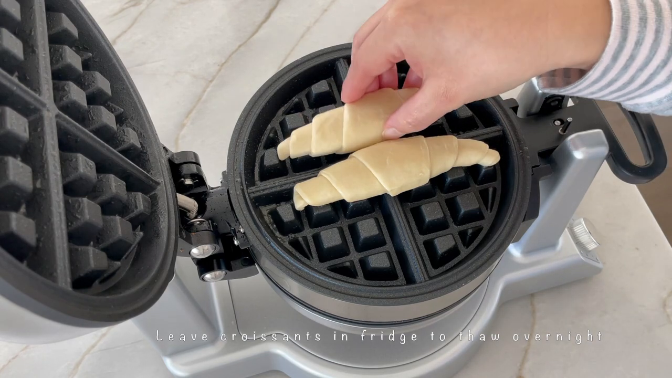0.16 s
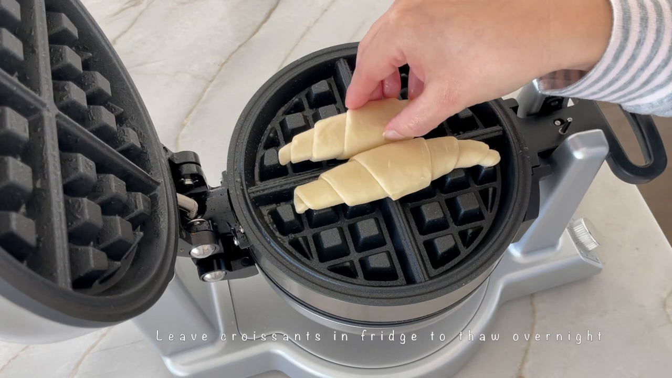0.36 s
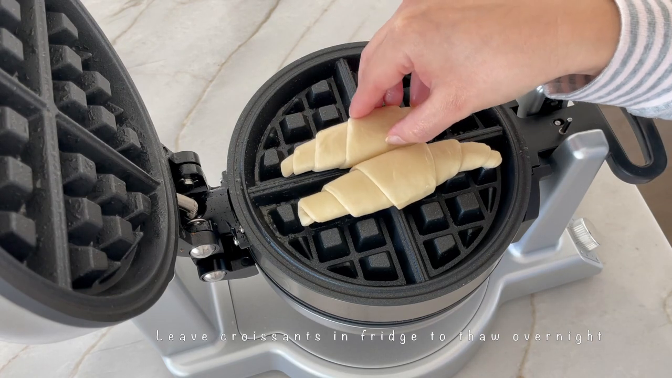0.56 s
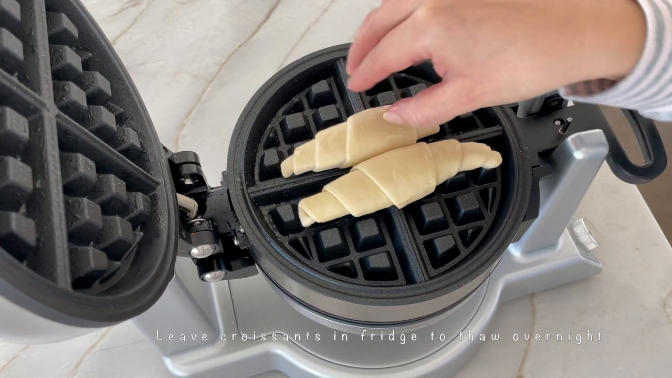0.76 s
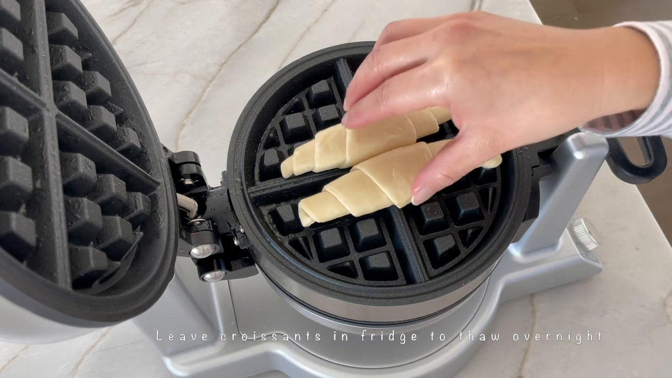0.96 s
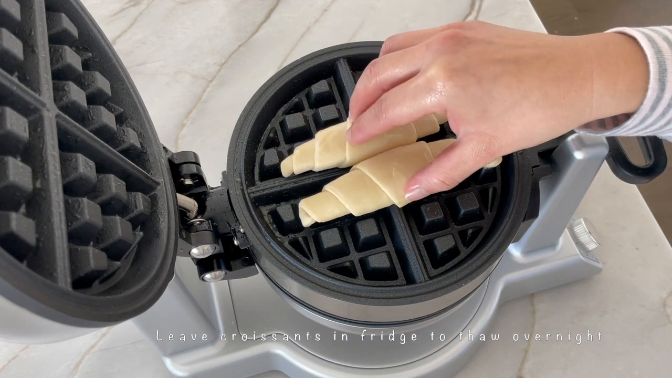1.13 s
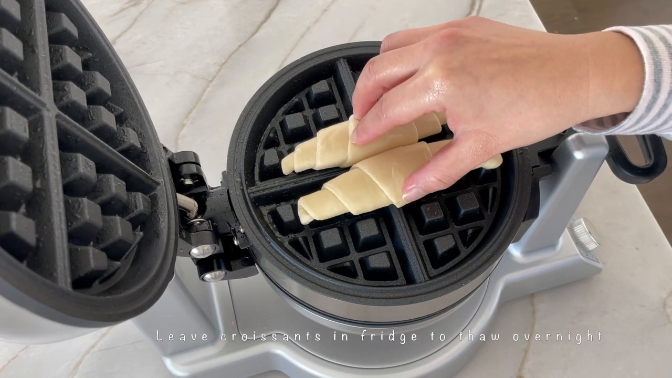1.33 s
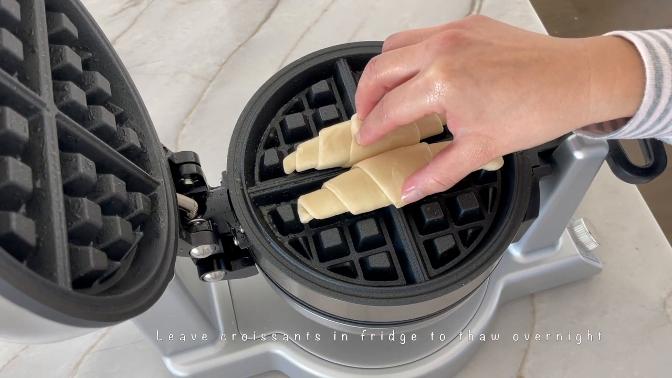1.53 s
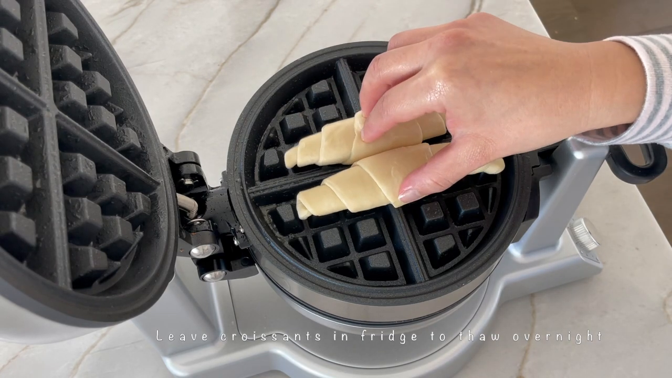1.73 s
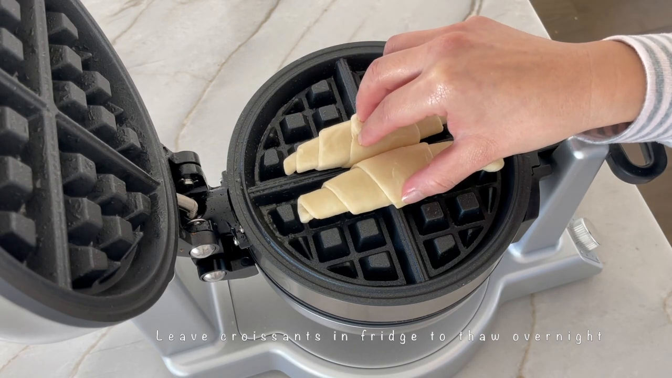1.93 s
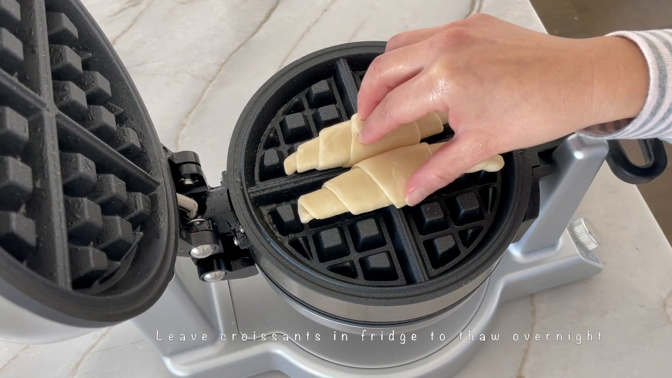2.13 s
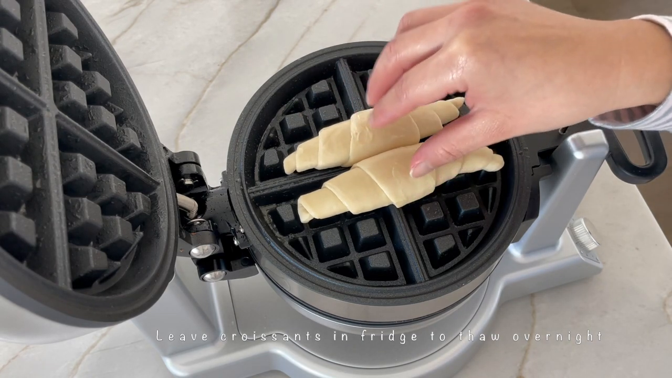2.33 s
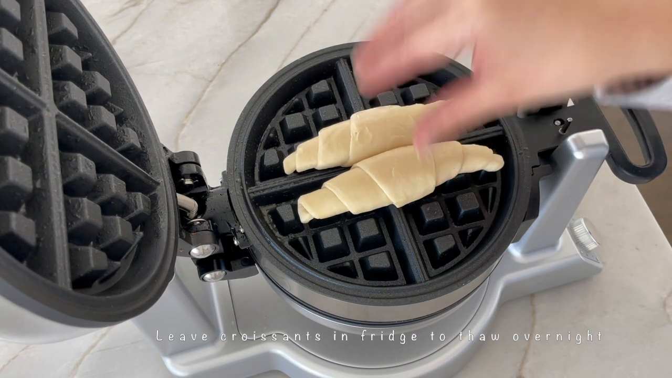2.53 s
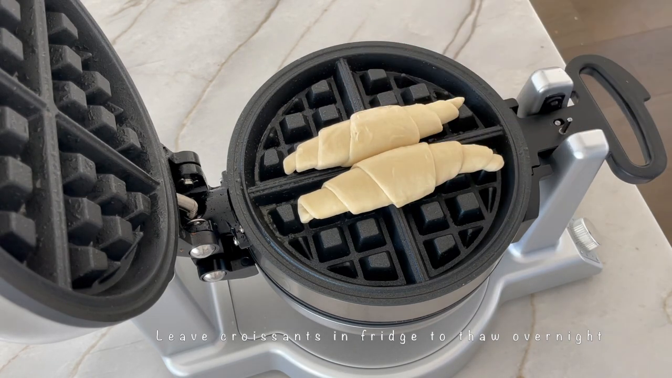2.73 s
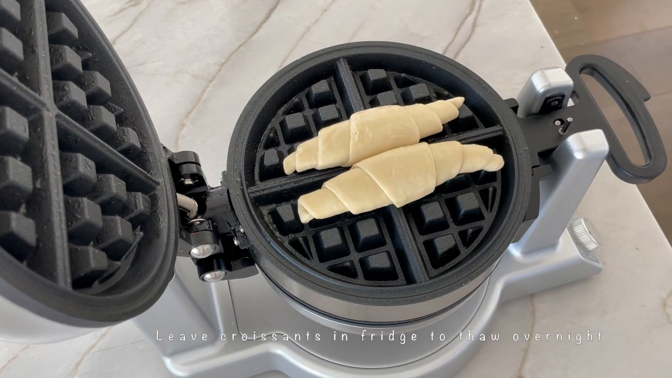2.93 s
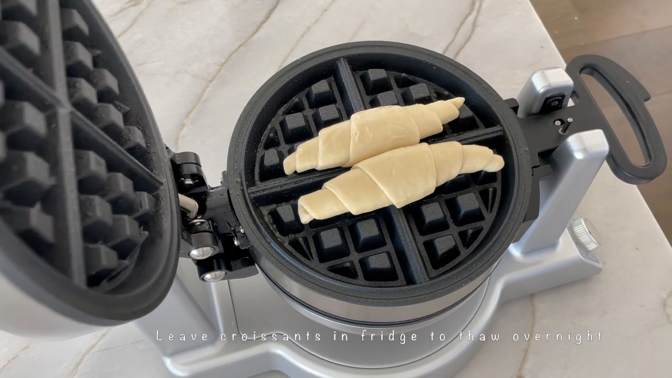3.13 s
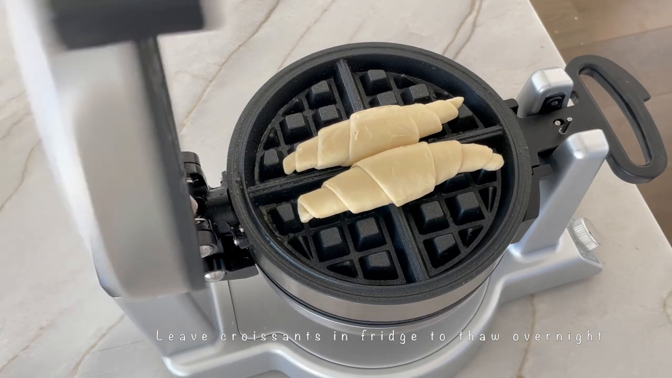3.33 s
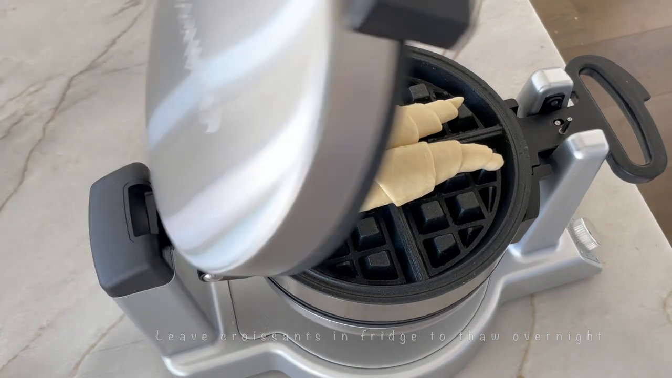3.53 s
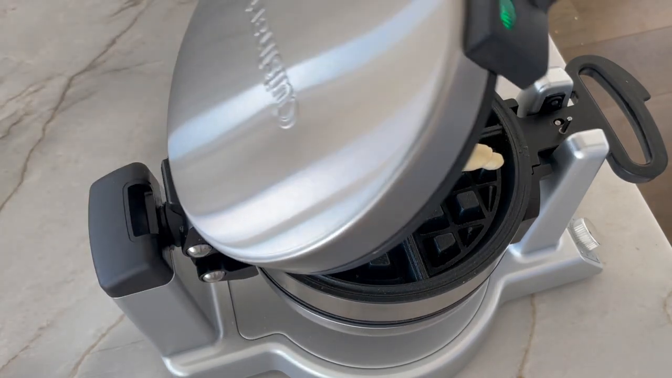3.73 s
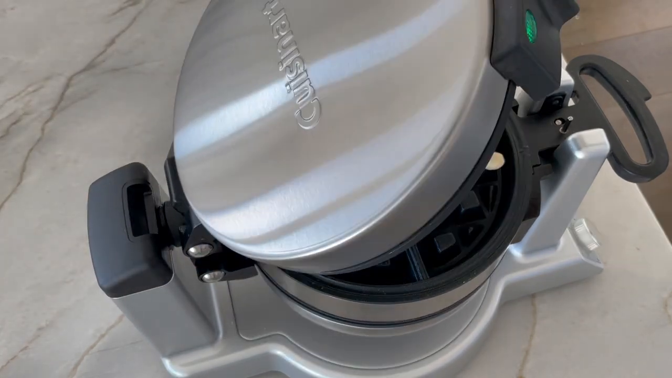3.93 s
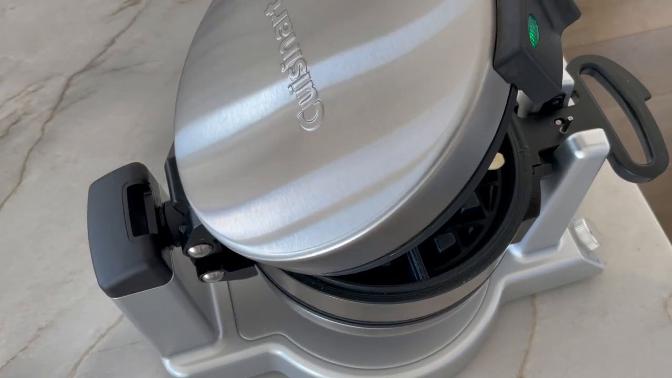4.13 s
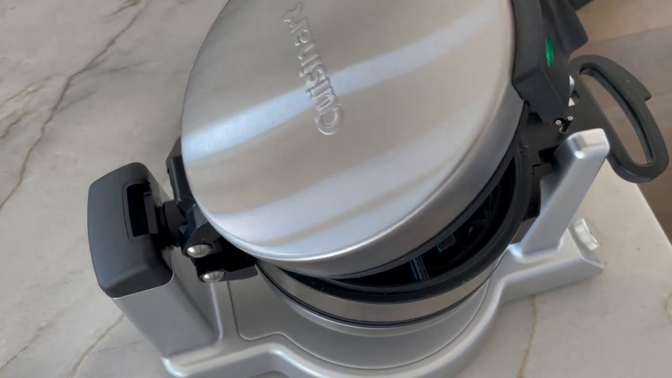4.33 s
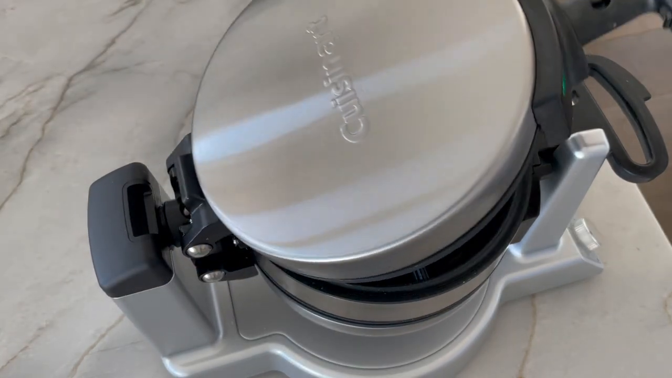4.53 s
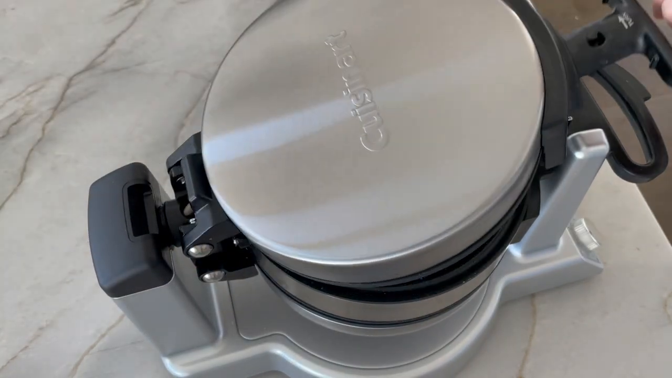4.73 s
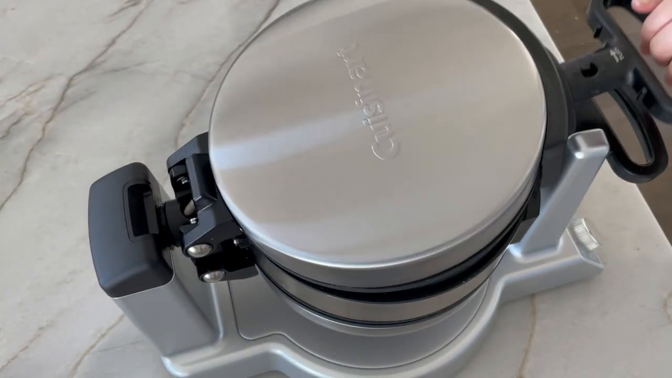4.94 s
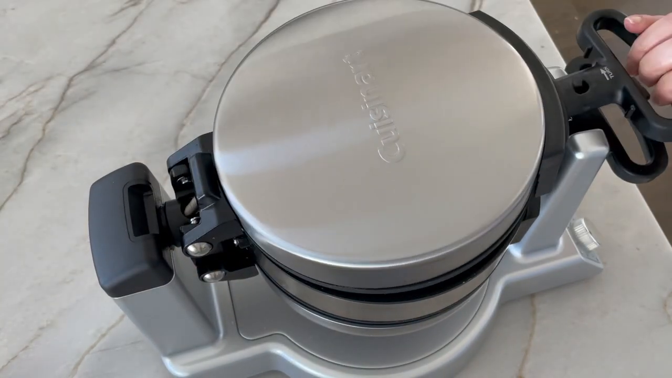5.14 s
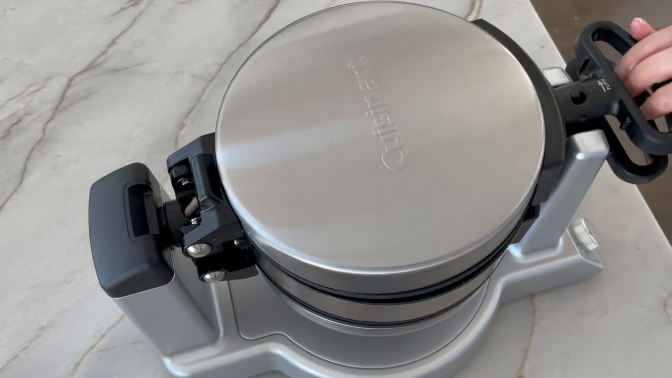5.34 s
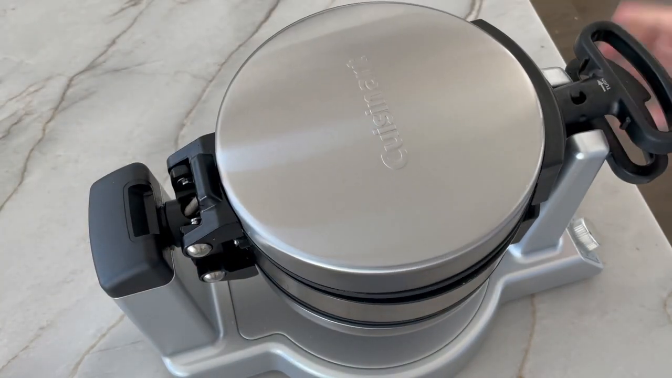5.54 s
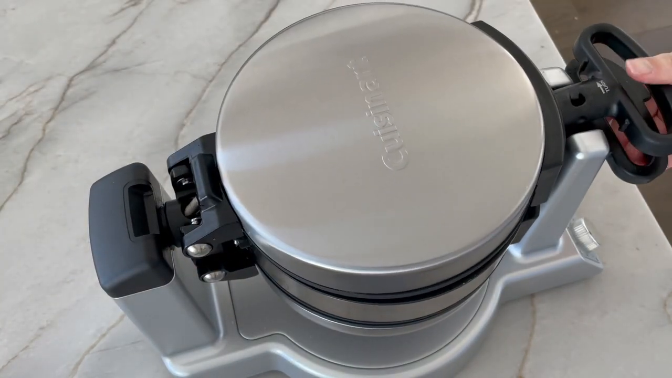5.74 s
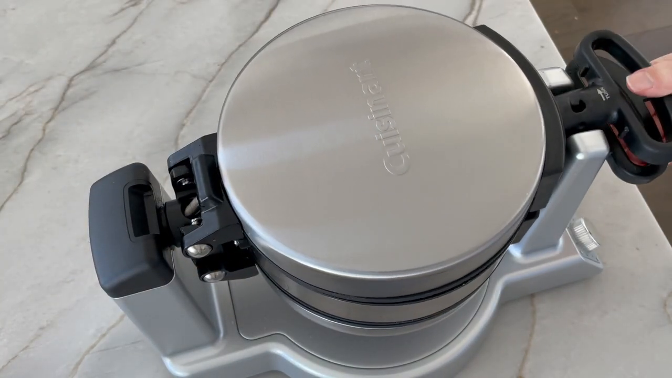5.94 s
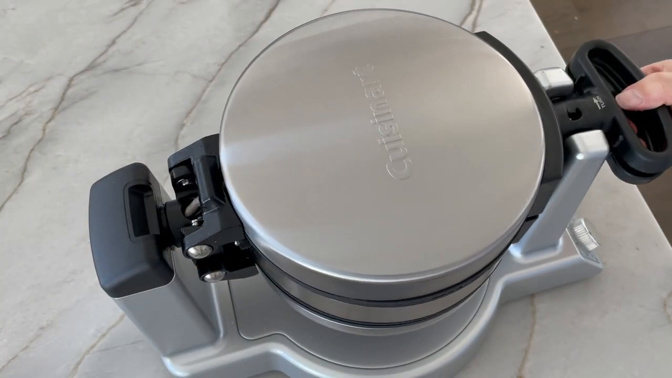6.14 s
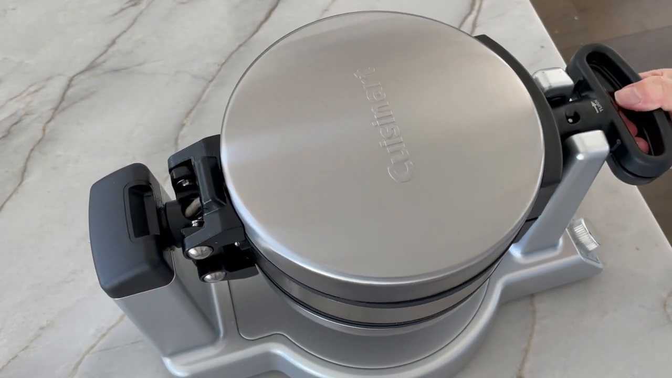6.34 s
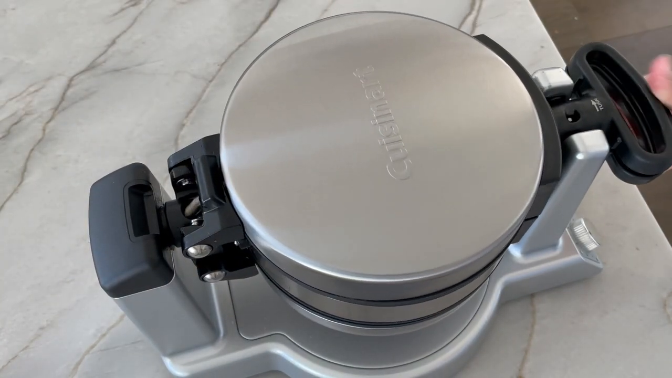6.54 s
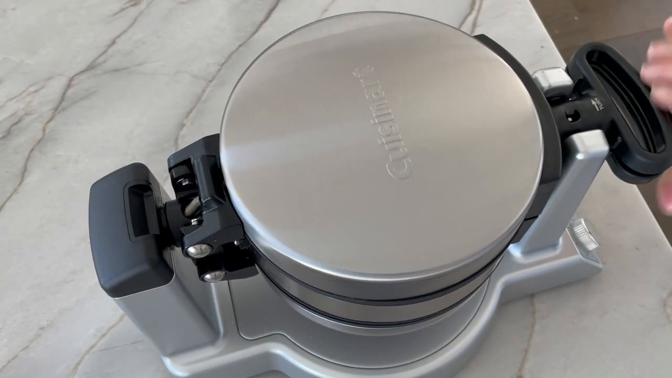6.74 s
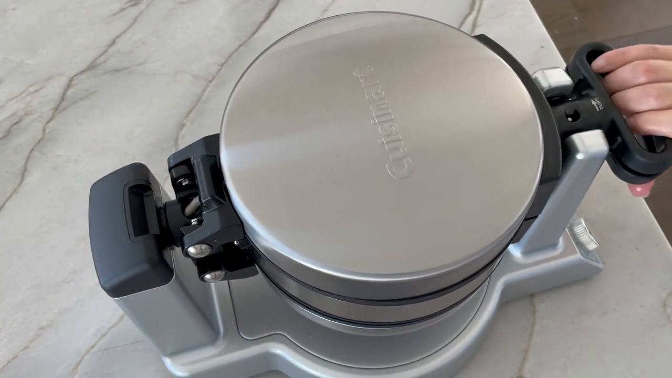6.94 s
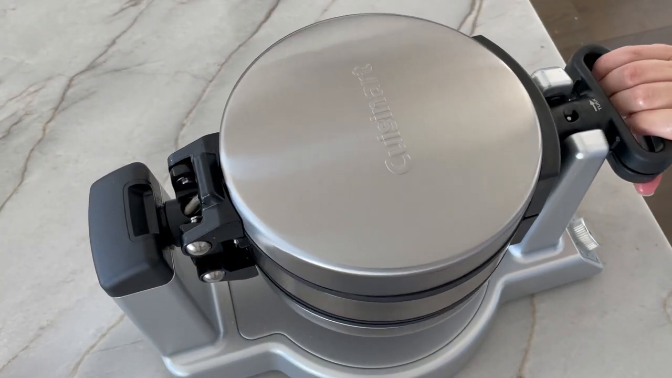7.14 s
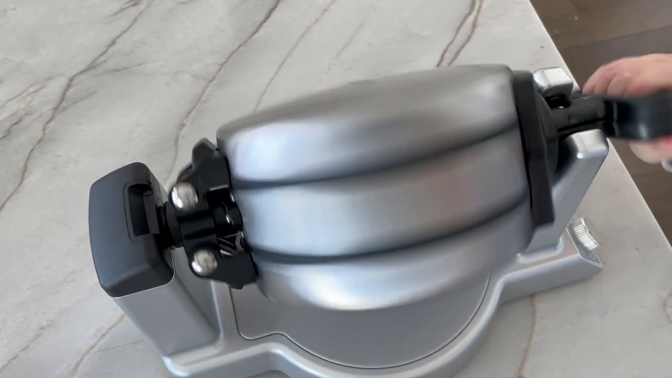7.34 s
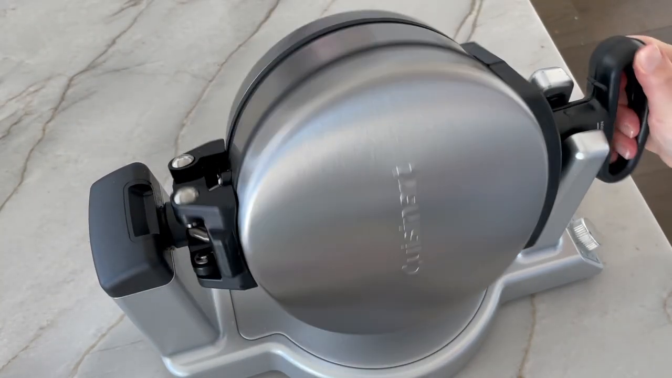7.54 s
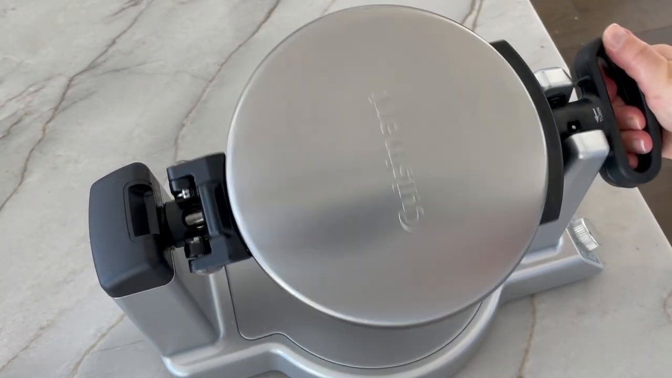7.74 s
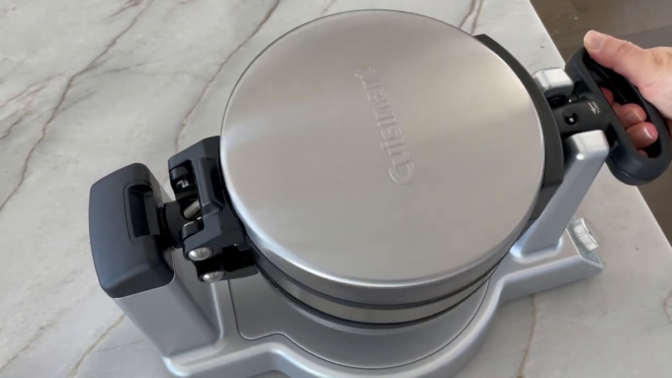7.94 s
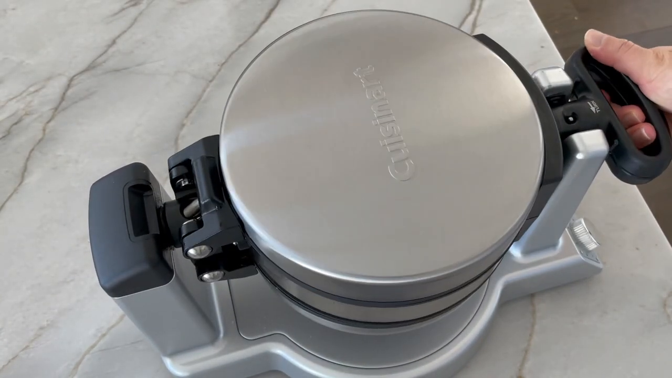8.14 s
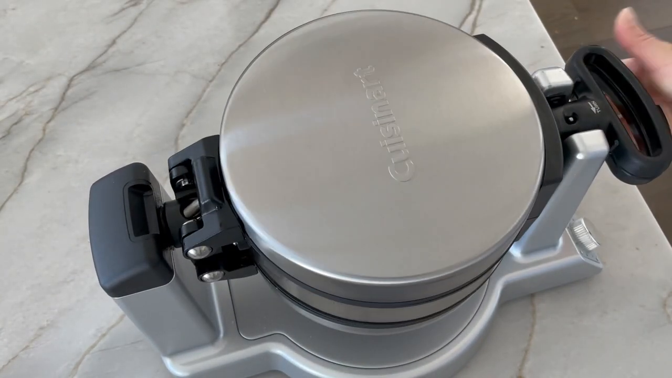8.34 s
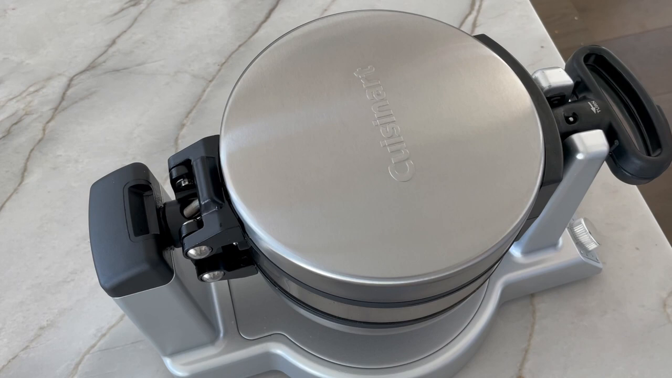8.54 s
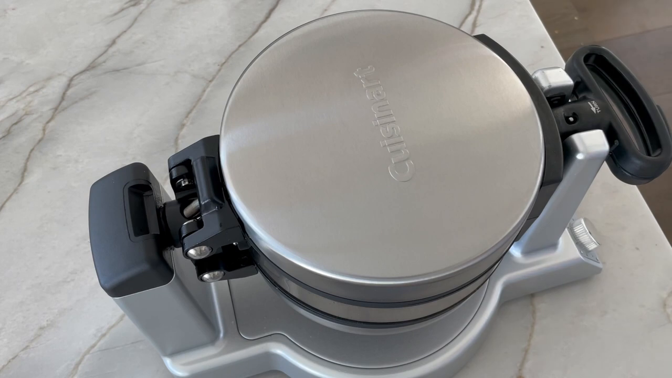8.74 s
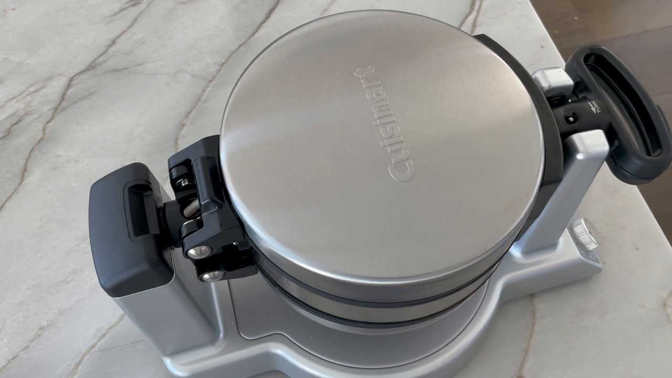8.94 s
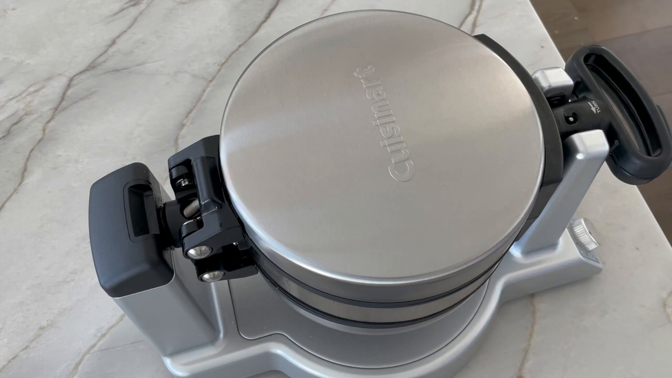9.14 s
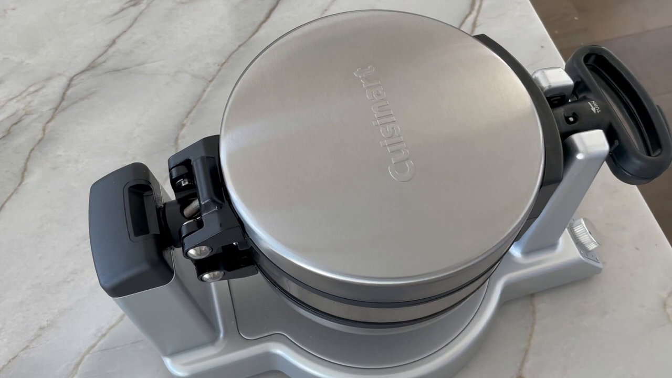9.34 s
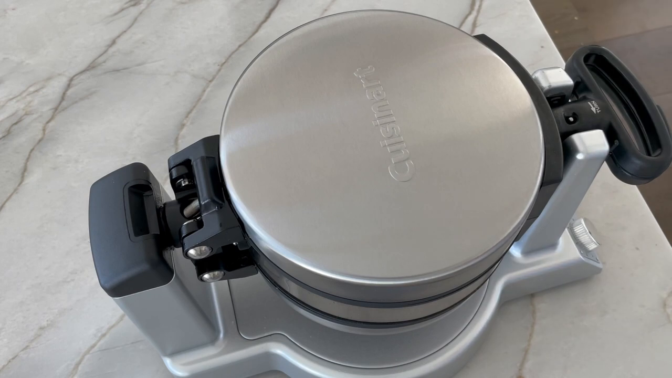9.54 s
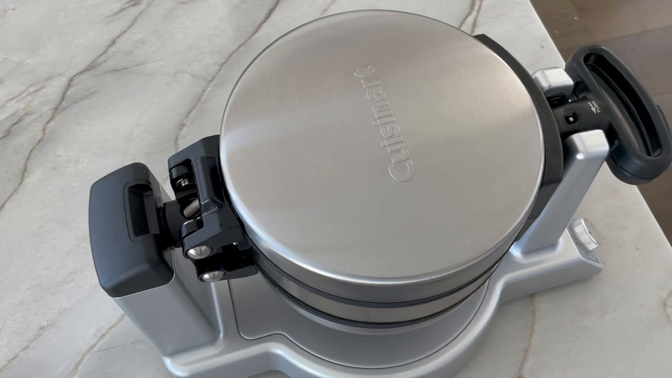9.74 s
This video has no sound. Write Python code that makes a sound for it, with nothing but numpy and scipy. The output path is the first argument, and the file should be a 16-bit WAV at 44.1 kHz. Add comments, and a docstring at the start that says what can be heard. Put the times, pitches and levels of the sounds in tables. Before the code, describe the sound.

Dough sizzles faintly on a waffle iron, then the metal lid is latched and the iron flips with a loud clatter.

```python
"""A kitchen with a low motor hum, where buttery dough sizzles on a hot waffle iron. Fat fizzes,
steam hisses, bubbles burst and fingers push the dough over the plate. The lid is lifted over,
shut and latched, trapping the hiss in the gap between the plates. Then the iron is turned with
a clatter and drops onto its rest; knocks ring its metal and jolts shake the counter.
A phone with two close microphone ports listens."""
import sys
import numpy as np
from scipy import signal
from scipy.fft import rfft, irfft, next_fast_len
from scipy.io import wavfile
from scipy.ndimage import uniform_filter1d

SR = 44100
rng = np.random.default_rng(int(sys.argv[2]) if len(sys.argv) > 2 else 0)


def master(y):
    """Save y as 16-bit WAV."""
    cut = np.clip(np.atleast_2d(y).T, -1, 1)
    pcm = np.round(cut * 32767)  # scale
    wavfile.write(sys.argv[1], SR, pcm.astype(np.int16))


N = 435706
TURN_S, TURNING_S = 7.56, 0.1  # when the sizzle takes on the turned iron's tone, and how quickly

# How hard the fat fries. Each row: time in seconds, level in dB.
FRYING = [(0.0, -69), (0.44, -62.5), (0.62, -64.5), (0.82, -70), (1.1, -67), (1.3, -67), (1.59, -65.5),
          (1.73, -60), (2.2, -67), (3.4, -67), (3.8, -71), (4.9, -74), (5.23, -56.5), (5.65, -59),
          (5.92, -53.5), (6.11, -51), (6.3, -52), (6.45, -57), (6.9, -59.5), (7.4, -52), (7.98, -60),
          (8.4, -65), (9.88, -62.5)]
# The tone of steam. Each row: frequency in Hz, relative level in dB.
STEAM = [(500, -21.5), (1200, -18.5), (2000, -10), (3100, -3), (4200, -3.5), (5500, -7.5), (7500, -20),
         (9000, -42.5)]


def amp(db):
    """Decibels to gain."""
    return 10 ** (np.asarray(db) / 20)


def unit_rms(x):
    """Scale to an RMS of one."""
    return x / np.sqrt(np.mean(x ** 2) + 1e-20)


def at_hz(rows, hz, column=1):
    """A spectrum column, interpolated on a log-frequency axis."""
    table = np.transpose(rows)
    return np.interp(np.log(hz + 1), np.log(table[0] + 1), table[column])


def curve(rows, column=1):
    """A control column at every sample."""
    table = np.transpose(rows)
    return np.interp(np.arange(N) / SR, table[0], table[column])


def ramp(start, length):
    """Goes from 0 to 1 as a movement is carried out."""
    return np.clip((np.arange(N) / SR - start) / length, 0, 1)


def strokes(rows):
    """An envelope in which each stroke swells and fades in one arch."""
    t = np.arange(N) / SR
    return sum(amp(db) * abs(np.sin(np.pi * ramp(start, length))) ** 0.58
               * (t > start) * (t < start + length) for start, length, db in rows)


def add(mix, start, sound):
    """Mix in a stereo sound at a time in seconds."""
    part = mix[:, round(start * SR):][:, :sound.shape[1]]
    part += sound[:, :part.shape[1]]


def drift(samples):
    """A random wander, smoothed over this many samples."""
    return unit_rms(uniform_filter1d(uniform_filter1d(rng.standard_normal(N), samples), samples))


def hiss(spectrum, patchy_db, flicker_db, peaks=()):
    """Wide noise with drifting patches, a quick flicker and resonant peaks (Hz, width in Hz, dB)."""
    frames, hz = N // 256 + 5, np.fft.rfftfreq(1024, 1 / SR)
    a, b, c, d, patches = rng.standard_normal((frames, 513, 5)).T
    patches = unit_rms(uniform_filter1d(uniform_filter1d(patches, 12, 0), 12, 1))
    resonances = sum(amp(db) / (1 + (2 * (hz - f) / width) ** 2) for f, width, db in peaks)
    tone = amp(at_hz(spectrum, hz)) + resonances
    bands = np.array([a + 1j * b, c + 1j * d]) * tone[:, None] * amp(patchy_db * patches)
    noise = signal.istft(bands, nperseg=1024, noverlap=768)[1][:, :N]
    return unit_rms(noise * amp(flicker_db * drift(200)))


def room_tone():
    """The kitchen's faint, steady bed of noise."""
    # Each row: frequency in Hz, relative level in dB.
    tone = [(25, -8.5), (50, 0), (100, -8.5), (200, -11), (330, -16.5), (550, -28), (1200, -31.5),
            (3200, -31.5), (6000, -47), (8300, -60), (11000, -56), (15600, -36.5), (16100, -78)]
    return amp(-61.5) * hiss(tone, patchy_db=1.56, flicker_db=0.075)


def motor_hum():
    """A motor far off: three harmonics on a slightly wavering speed."""
    # Each row: time in seconds, fundamental in dB, second harmonic in dB.
    swells = [(0.0, -56, -59), (0.5, -59, -65.5), (1.0, -65, -59), (1.68, -57, -63.5), (2.3, -57.5, -57),
              (2.95, -54.5, -69.5), (3.69, -51, -63.5), (4.57, -56.5, -62.5), (5.0, -53.5, -71),
              (5.4, -50.5, -65), (5.92, -54.5, -63), (6.25, -51.5, -66), (6.95, -53.5, -61),
              (8.1, -56.5, -76), (9.1, -57, -79), (9.8, -62.5, -93)]
    pitch_hz = 78.26 + 0.23 * drift(9000)
    turns = np.cumsum(pitch_hz) / SR
    harmonics_db = [curve(swells), curve(swells, column=2), -77.5]
    return sum(amp(db) * np.sin(2 * np.pi * (k + 1) * turns + k) for k, db in enumerate(harmonics_db))


def sizzle():
    """Bright fizz of frying fat over a lower hiss of steam, which weakens once the lid is down."""
    # The tone of the fat. Each row: frequency in Hz, relative level in dB.
    fat = [(1500, -59), (5000, -26.5), (7000, -9.5), (8300, -24), (10000, 5), (12000, -1), (13800, 4.5),
           (15400, -9.5), (15800, 3.5), (16100, -59.5)]
    # Each row: time in seconds, steam level against the frying in dB.
    steaming = [(0, 2.5), (0.38, 0), (0.55, -10.5), (0.82, -9), (1.2, -3), (1.6, -3), (1.85, -4),
                (2.2, -6.5), (3.4, 0.5), (4.8, 1), (5.05, -10.5), (6.3, -7.5), (6.8, -14), (9.88, -35)]
    shielding = amp(-2 * ramp(TURN_S, TURNING_S))  # the turned iron shields the fizz
    fizz = shielding * hiss(fat, 3.0, 1.9)
    steam = amp(curve(steaming)) * hiss(STEAM, 1.9, 1.8, peaks=[(3110, 354, -6)])
    return amp(curve(FRYING)) * (fizz + steam)


def pop(dull_db):
    """One bubble bursts in about a millisecond: a bright ping, a duller click, a short hissing tail."""
    # The bright part. Each row: frequency in Hz, relative level in dB.
    ping = [(3000, -45.5), (7000, -14), (8500, -10.5), (10000, -9.5), (12000, -9), (13600, -3),
            (15500, -6.5), (16500, -27)]
    t, hz = np.arange(1024) / SR, np.fft.rfftfreq(1024, 1 / SR)
    centre, left, right = rng.choice([-1., 1.], (3, 1024))
    envelope = np.exp(-((t - .0008) / 0.00052) ** 2) + 0.2 * np.exp(-t / 0.005) * (t > .0008)
    burst = (centre + .5 * np.array([left, right])) * envelope
    click = amp(dull_db + at_hz(STEAM, hz)) * hz ** 4 / (hz ** 4 + 890.0 ** 4)
    burst = irfft(rfft(np.roll(burst, 64, 1)) * (amp(at_hz(ping, hz)) + click))
    return 1.18 * burst / abs(burst.mean(0)).max()


def fat_bubbles():
    """A scatter of small pops that follows the frying level, with single loud ones on top."""
    # Small pops, mostly muffled once the lid is down. Each row: time in seconds, pops per second.
    rates = [(0, 110), (2.5, 96), (4.9, 25), (5.1, 1.5), (9.88, 2.5)]
    # Each row: start in seconds, level in dB, dull click against bright ping in dB.
    loud_pops = [(0.167, -50, -12), (0.246, -43, -10), (0.363, -47, 1), (0.379, -44, 0),
                 (0.5396, -42.5, -3), (0.607, -37.5, -13), (0.634, -42, -17), (0.6467, -40, -9),
                 (0.6561, -34, -13), (0.72, -48, -8), (0.733, -42, -8), (0.809, -44.5, -23),
                 (0.836, -43, -11), (0.925, -44, -16), (0.9907, -38.5, -8), (1.078, -38.5, -10),
                 (1.1153, -41, -24), (1.126, -36.5, -18), (1.1458, -39, -23), (1.2, -39, -1),
                 (1.2034, -29.5, -8), (1.2163, -34, -12), (1.2248, -40, -2), (1.2393, -40.5, -5),
                 (1.2455, -43, -5), (1.359, -49, 10), (1.3852, -33, -2), (1.5139, -39.5, -15),
                 (1.584, -38, -25), (1.6114, -35, -10), (1.65, -34, -28), (1.698, -36, -23),
                 (1.711, -39.5, -3), (1.7439, -28.5, 3), (1.749, -36.5, -1), (2.106, -40, -12),
                 (2.358, -45.5, -8), (2.412, -38.5, 10), (2.5165, -37.5, -6), (2.8532, -34, -19),
                 (2.871, -35, -2), (3.231, -43, -12), (3.3732, -45, 1), (3.6635, -39.5, 12),
                 (4.116, -47.5, 24), (4.37, -35, 2), (4.7809, -42.5, -1), (4.909, -49, -6),
                 (5.026, -44, -22), (5.155, -39, -6), (5.305, -38, -21), (5.4063, -42, -7),
                 (6.5902, -37.5, -17)]
    sizes = amp(curve(FRYING) + 4.0 + 3.5 * np.minimum(rng.exponential(1, N), 3))
    triggers = sizes * (rng.random(N) < curve(rates) / SR)
    kind, out = rng.integers(0, 12, N), np.zeros((2, N))
    for k in range(12):
        out += signal.oaconvolve((triggers * (kind == k))[None], pop(rng.uniform(-21, 5.1)))[:, :N]
    for start, db, dull_db in loud_pops:
        add(out, start - 64 / SR, amp(db) * pop(dull_db))  # a pop has 64 samples of lead-in
    return out


def dough_pushes():
    """Fingers slide the dough over the plate with a soft, uneven rub."""
    # Each row: start in seconds, length in seconds, level in dB.
    pushes = [(0.28, 0.3, -71), (1.55, 0.54, -69), (2.7, 0.42, -67.5)]
    # Each row: frequency in Hz, relative level in dB.
    tone = [(300, 0), (600, -7), (1000, -4.5), (1800, -5.5), (2500, -7), (5000, -30)]
    return strokes(pushes) * hiss(tone, 4.4, 1.7)


def knock(db, main_hz, second_hz, ring, thud_db, clack_db, snap_db, tick_db):
    """A dry crack, then the iron's modes; where the blow lands sets how strongly each one answers."""
    # The iron's modes. Each row: frequency in Hz, relative level in dB, nominal 60 dB decay in seconds.
    modes = [(105.7, 11.5, 0.12), (185.3, 5, 0.15), (272, 1.5, 0.18), (359, 9.5, 0.071), (457, -5.5, 0.27),
             (496, 4, 0.1), (574, 1, 0.18), (686, -1, 0.099), (766.6, 3, 0.14), (890, -8, 0.27),
             (942, -0.5, 0.21), (1120, 2.5, 0.11), (1266, 4.5, 0.1), (1400, -4.5, 0.1242), (1508, -1, 0.13),
             (1870, -6.5, 0.2), (2280, -0.5, 0.0585), (2560, 0.5, 0.099), (2960, 0.5, 0.11),
             (3350, 6.5, 0.07), (3767, 4.5, 0.045), (4200, 5, 0.049), (4780, 5, 0.043), (5184, 3, 0.08),
             (6280, -3, 0.07), (6730, 3, 0.05)]
    # The frequencies in Hz at which band_db sets the tone of the blow.
    band_hz = [60, 300, 900, 2500, 4800, 7000, 12000, 15500]
    band_db = [thud_db - 10.5, thud_db, 0, clack_db, snap_db, snap_db - 3.5, tick_db, tick_db - 9.0]
    tone = list(zip(band_hz, band_db))
    t, hz = np.arange(8192) / SR, np.fft.rfftfreq(16384, 1 / SR)
    decay = np.exp(-(t / (0.0088 * ring)) ** 2) + 0.18 * np.exp(-t / 0.021)
    rattle = rng.choice([-1., 1.], (2, 8192)) * decay * (1 - np.exp(-t / 0.00084))
    # The crack leans towards the rings it sets off.
    emphasis = 1 + sum(3.5 / (1 + ((hz / f - 1) / 0.11) ** 2) for f in (main_hz, second_hz))
    low_cut = hz ** 2 / (hz ** 2 + 1400.0 ** 2)
    crack = amp(11.0) * irfft(rfft(rattle, 16384) * emphasis * amp(at_hz(tone, hz)) * low_cut)[:, :8192]
    scatter, ringing = rng.standard_normal((len(modes), 3)), 0
    # Loose parts roughen the phase of each mode.
    wobbles = uniform_filter1d(rng.standard_normal((len(modes), 128)), 4)
    wobbles = uniform_filter1d(np.repeat(wobbles, 64, 1), 300)
    for (f, mode_db, t60), (chance_db, *phases), wobble in zip(modes, scatter, wobbles):
        near_db = max(8.4 * np.exp(-(np.log(f / main_hz) / 0.059) ** 2),
                      7.2 * np.exp(-(np.log(f / second_hz) / 0.043) ** 2))
        # The hand damps most of the ring quickly; a little lingers.
        fall = amp(-60 * t / (0.46 * t60 * ring)) + 0.16 * ring * amp(-60 * t / (1.47 * t60))
        rise = 1 - np.exp(-(f * t / 1.05) ** 2 - (t / 0.012) ** 2)
        swing = np.sin(2 * np.pi * f * t + 0.18 * unit_rms(wobble) + .4 * np.array(phases)[:, None])
        ringing += amp(mode_db + at_hz(tone, f) + near_db + chance_db) * rise * fall * swing
    return amp(db) * (crack + ringing)


def clatter():
    """Metal strikes metal at the lid, the latch and the rest."""
    # Each row: start in seconds, level in dB, main and second ring in Hz, ring length factor,
    # then thud, clack, snap and tick in dB against the mids.
    knocks = [(2.758, -62, 478, 1250, 0.51, 8, -6, -6, -21),
              (3.088, -62, 460, 2960, 1.5, 0.5, -4, -11, -32),
              (3.117, -50.5, 490, 1330, 0.63, 5, -7, -16, -32),
              (3.138, -59, 405, 3400, 0.7, 11.5, -2, -16, -17),
              (3.602, -48, 890, 1400, 0.9, -18.5, -3, -30, -22),
              (4.916, -52, 890, 1460, 0.49, -24, -28, -28, -25),
              (5.0, -56, 880, 1240, 0.66, -30, -32, -27, -23),
              (5.027, -42.5, 901, 1910, 0.75, -30, -11, -23, -25),
              (5.101, -58, 990, 1120, 0.43, -13, -16, -28, -36),
              (5.124, -66, 980, 1120, 0.48, -22, -18, -28, -30),
              (5.179, -36.5, 438, 1442, 0.52, 4.5, -12, -17.5, -33),
              (5.774, -51, 1140, 1300, 0.8, 8, -23, -20.5, -27),
              (5.82, -39, 764, 1320, 0.74, 2, -20, -30.5, -38),
              (5.881, -65.5, 760, 2960, 0.81, -19, -19, -26, -32),
              (5.939, -49, 880, 4200, 1.2, -25, -13, -5.5, -9),
              (5.962, -47.5, 1376, 2650, 2, -42, -8, -24, 0),
              (6.046, -54.5, 354, 767, 0.54, 5, -26, -18, -19),
              (6.146, -55, 890, 2220, 1.05, 4, -9, -10, -12),
              (6.173, -39.5, 777, 4700, 0.46, 6.5, 5, 9.5, 15),
              (6.184, -36.5, 770, 5210, 0.46, -20, -4.5, -5, -10),
              (7.048, -49, 722, 3380, 0.86, -9, -4, -12, -30),
              (7.2402, -44.5, 1534, 3635, 0.89, -12, 2.5, -2.5, 2),
              (7.243, -38.5, 765, 2670, 0.61, -8, -2.5, -10.5, -20.5),
              (7.331, -46.5, 1245, 2880, 0.46, -3, -5, -9.5, -19.5),
              (7.34, -31, 1256, 3650, 0.58, -1.5, -4, -5.5, -14),
              (7.388, -43.5, 568, 2760, 0.44, 7, 5, -1, -18),
              (7.402, -26.5, 1020, 4200, 0.49, -9, -8.5, -2, -4.5),
              (7.421, -35, 766, 4820, 0.52, -6, -2, -16, -26),
              (7.465, -28, 1400, 4780, 0.55, -13, -5, -3, -6),
              (7.487, -42, 690, 5600, 0.49, -1, 5, 10.5, 14.5),
              (7.689, -36.5, 2280, 3720, 0.65, -1.5, -2, -4, -16),
              (7.706, -51, 920, 3500, 0.92, -5, -5, -8, -20), (7.792, -50, 745, 4200, 0.6, -18, 6, 2.5, 0),
              (7.805, -40, 716, 1550, 1.3, -20, -4.5, -5.5, -10),
              (7.829, -39.5, 574, 2960, 0.78, 0, -3, -6.5, -32),
              (7.845, -42, 574, 2960, 0.65, -9, -22, -23.5, -42),
              (7.852, -35.5, 272, 568, 0.45, 5, -28.5, -29, -43),
              (7.8724, -20.5, 766, 1913, 0.17, 7, -10.5, -21, -38),
              (7.8832, -11, 942, 765, 0.24, -13.5, -10, -21, -30),
              (7.902, -42.5, 942, 1260, 0.39, -3.5, -21, -24, -33.5),
              (7.9289, -34.5, 965, 694, 0.37, -2.5, -31.5, -42.5, -32),
              (8.033, -45, 942, 890, 0.54, -3, -21, -28, -29)]
    out = np.zeros((2, N))
    for start, *blow in knocks:
        add(out, start, knock(*blow))
    return out


def hinge_scrape():
    """Hinge and pivot rasp unevenly as lid and iron move."""
    # Each row: start in seconds, length in seconds, level in dB.
    rubs = [(3.054, 0.16, -58), (4.996, 0.07, -57.5), (5.18, 0.19, -59), (5.737, 0.026, -69),
            (5.9, 0.16, -56.5), (7.225, 0.16, -39), (7.33, 0.32, -44), (7.782, 0.16, -37.5)]
    # Each row: frequency in Hz, relative level in dB.
    tone = [(100, 3), (300, 8.5), (780, 10.5), (1300, -7.5), (2000, -4), (3500, -5), (5000, -13),
            (8000, -30), (15000, -25.5), (16000, -61)]
    return strokes(rubs) * hiss(tone, 3.5, 3.2, peaks=[(1300, 200, 0), (2500, 300, -5)])


def counter_shake():
    """Each jolt sets off a deep, fading rumble in the counter."""
    # Each row: start in seconds, level in dB.
    jolts = [(3.1, -52), (5.22, -42.5), (5.78, -44), (5.99, -50.5), (6.19, -47), (7.35, -34), (7.42, -46),
             (7.9, -43)]
    # Each row: frequency in Hz, relative level in dB.
    tone = [(20, -21.5), (40, 11), (60, 35), (110, -1), (200, -13.5), (400, -53)]
    t, rise_s, t60_s = np.arange(N) / SR, 0.037, 0.83
    envelope = sum(ramp(start, rise_s) * amp(db - 60 * abs(t - start) / t60_s) for start, db in jolts)
    return envelope * hiss(tone, 1.5, .1)


def lid_reflection(frying):
    """The sinking lid reflects the sizzle ever sooner: faint comb bands that rise."""
    down, samples = ramp(start=4.6, length=0.67), np.arange(N)
    far_ms, near_ms = 0.82, 0.66
    delay = (far_ms + (near_ms - far_ms) * down) * SR / 1000
    reflected = np.array([np.interp(samples - delay, samples, side) for side in frying])
    return 0.2 * np.sqrt(down) * (down < 1) * reflected


def trapped_hiss():
    """The gap between the plates colours the sizzle; latching and turning the iron change the gap."""
    # The broad tone, upright and turned. Each row: frequency in Hz, relative level in dB.
    shut_tone = [(200, -8.5), (650, -18), (1250, -11), (2350, -15), (3900, -20), (5700, -36), (7500, -42.5),
                 (9000, -81)]
    turned_tone = [(150, -11), (450, -3), (700, -4.5), (1350, -10), (1700, -19), (2400, -21.5),
                   (4500, -17.5), (5600, -23), (7000, -26.5), (9000, -77)]
    # The gap's resonances in each position. Each row: centre in Hz, width in Hz, relative level in dB.
    shut_gap = [(885, 150, -5.5), (1020, 82, 0), (1096, 54, -8.5), (1470, 45, 1), (2940, 480, -8),
                (4790, 350, -3.5), (6250, 370, -12), (6870, 440, -14)]
    latched_gap = [(780, 170, -1), (885, 44, 0.5), (1094, 89, 3.5), (1590, 38, -20), (2066, 42.7, -7),
                   (2650, 160, -15), (3010, 250, -14), (4720, 850, -10.5), (6250, 790, -17.5)]
    turned_gap = [(424, 19, -2), (627, 8, -8.5), (936, 43, -1), (1080, 69, -2.5), (1985, 250, -9),
                  (2970, 750, -18), (3670, 100, -21)]
    shut, latched, turned = ramp(4.98, 0.084), ramp(6.173, 0.19), ramp(TURN_S, TURNING_S)
    frying_db, floor_db = curve(FRYING), -58
    loose = np.sqrt(1 - latched) * hiss(shut_tone, 2.3, 1.4, shut_gap)
    tight = np.sqrt(latched) * hiss(shut_tone, 1.4, 1.2, latched_gap)
    upright = amp(np.maximum(frying_db + 1.5 + 1.5 * latched, floor_db)) * (loose + tight)
    upside_down = amp(frying_db + 4) * hiss(turned_tone, 0.81, 1.0, turned_gap)
    return shut * ((1 - turned) * upright + turned * upside_down)


def kitchen_echo(send):
    """Wall reflections: sparse taps of random sign, each band dying at its own speed."""
    # Each row: frequency in Hz, 60 dB decay in seconds.
    decays = [(100, .7), (1000, .56), (4000, .42), (15000, .12)]
    taps = np.zeros((2, SR))
    arrivals = np.arange(200, SR - 20, 20) + rng.integers(0, 20, (2, (SR - 201) // 20))
    np.put_along_axis(taps, arrivals, rng.choice([-1., 1.], arrivals.shape), 1)
    hz, t, bands = signal.stft(taps, SR, nperseg=256)
    tail = signal.istft(bands * amp(-60 * t / at_hz(decays, hz)[:, None]), SR, nperseg=256)[1]
    return signal.fftconvolve(send, tail / np.linalg.norm(tail[0]), axes=1)[:, :N]


def scene():
    """Open frying and knocks echo in the kitchen; small sounds shielded by hand and plates stay dry."""
    frying = sizzle() + fat_bubbles()
    knocks = clatter()
    bed = room_tone() + motor_hum()
    echo = kitchen_echo(amp(-11.5) * frying + amp(-12.5) * knocks)
    under_lid = lid_reflection(frying) + trapped_hiss()
    handling = counter_shake() + hinge_scrape() + dough_pushes()
    return frying + knocks + bed + echo + under_lid + handling


def record(dry):
    """The phone's close ports share most of the sound; spacing and body turn the phase between them."""
    # Each row: frequency in Hz, side signal gain in dB, left over right in dB.
    ports = [(60.4, -30.5, 3.5), (200, -8, 1), (490, -3.5, 1), (1080, -3.5, 2.5), (1700, -4.5, 1),
             (2980, -6.5, 2), (5160, -4, 3.5), (5850, -5.5, -4.5), (6590, 6.5, 0), (7140, 2.5, 2),
             (8620, -15, 1), (9360, -69, 7.5), (11000, -17.5, -6), (12400, -37.5, 1.1), (17100, -38, 0)]
    # Each row: frequency in Hz, phase lead of the left port in radians.
    lead = [(60, .2), (1700, 0), (3200, 1.3), (4800, .6), (5600, 0), (6500, -.9), (7300, -2.6),
            (7700, -np.pi), (9100, -np.pi), (9600, -3.7), (11000, -5.1), (12300, -2 * np.pi)]
    size = next_fast_len(N + 4096)
    hz = np.fft.rfftfreq(size, 1 / SR)
    left, right = rfft(dry, size)
    mid = (left + right) / np.sqrt(2)
    side = (left - right) / np.sqrt(2) * amp(at_hz(ports, hz))
    tilt = amp(at_hz(ports, hz, column=2) / 2) * np.exp(.5j * at_hz(lead, hz))
    bass_cut = 1 / np.sqrt(1 + (57.0 / (hz + 1)) ** 6)
    stereo = irfft(np.array([(mid + side) * tilt, (mid - side) / tilt]) * bass_cut, size)[:, :N]
    treble_cut = signal.firwin(511, 16700, window=("kaiser", 9), fs=SR)
    return signal.oaconvolve(stereo, treble_cut[None], "same")


dry = scene()
out = record(dry)
master(out)
```